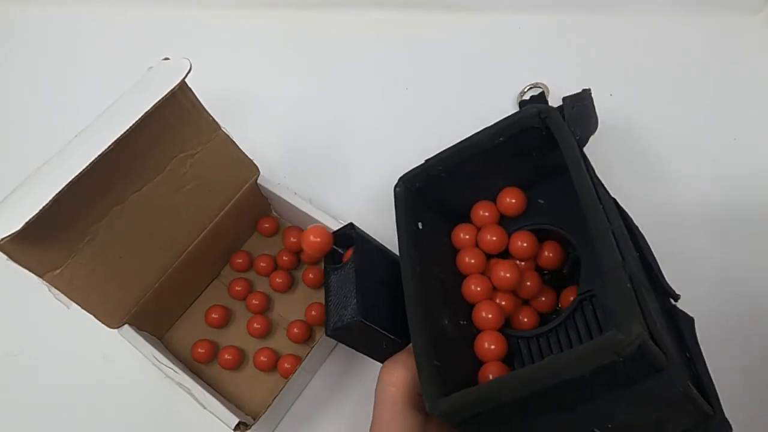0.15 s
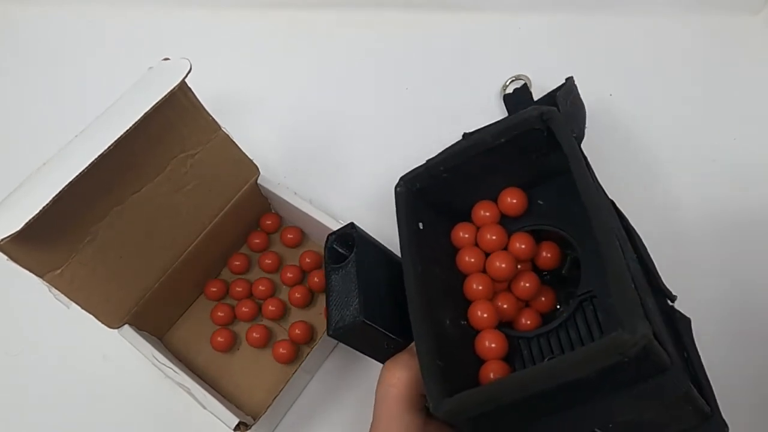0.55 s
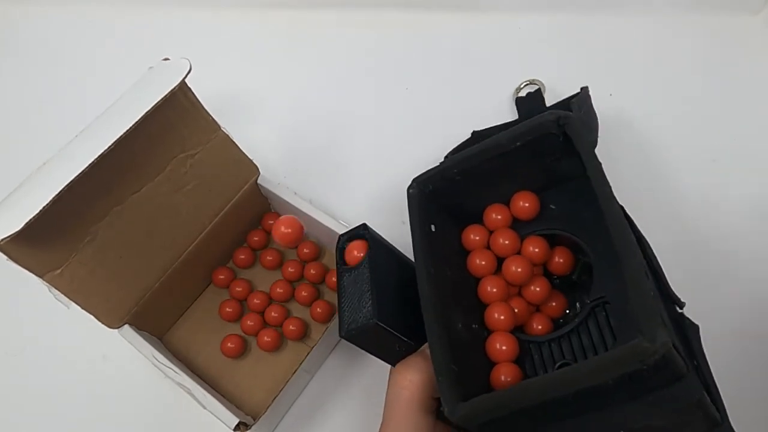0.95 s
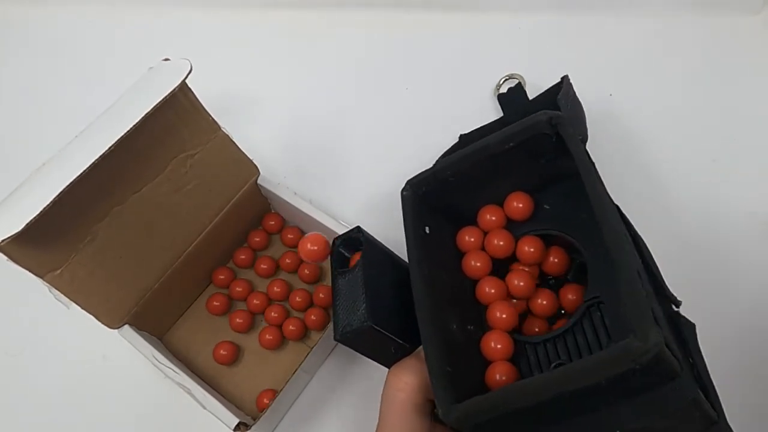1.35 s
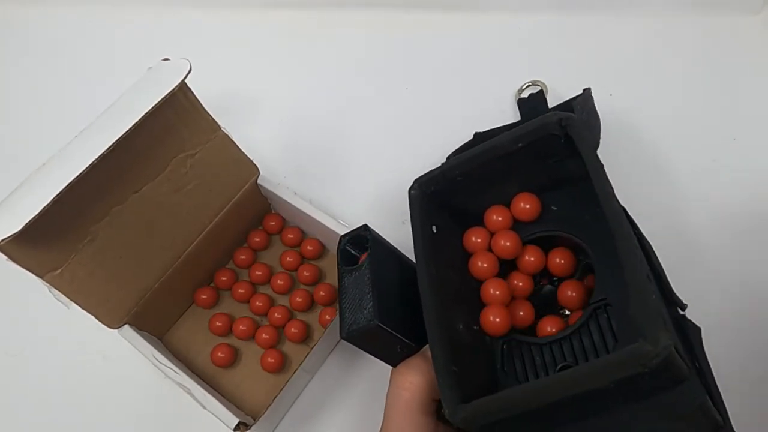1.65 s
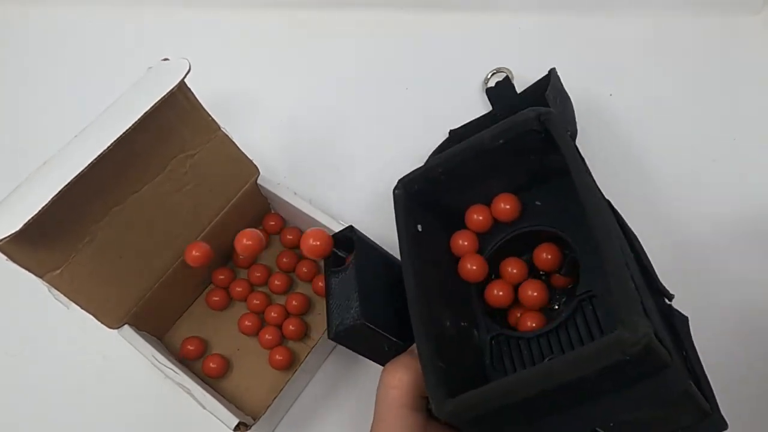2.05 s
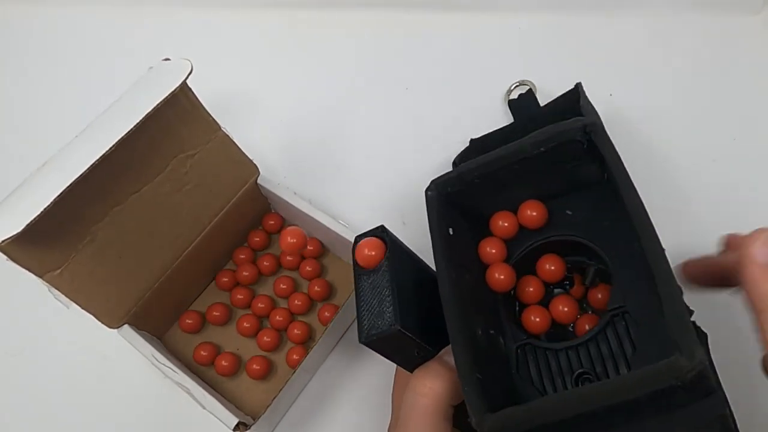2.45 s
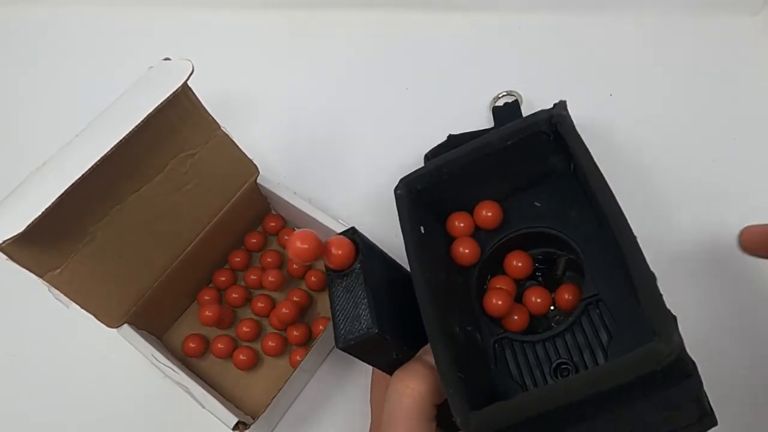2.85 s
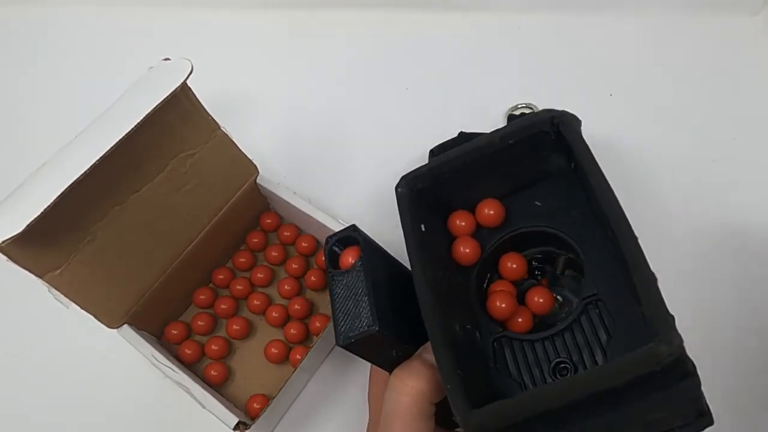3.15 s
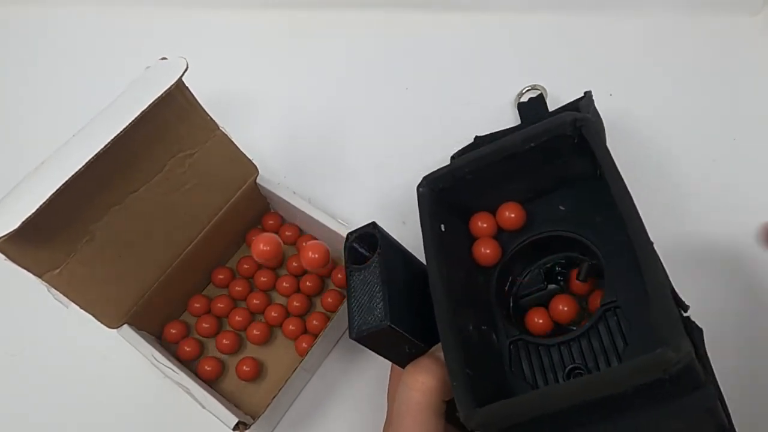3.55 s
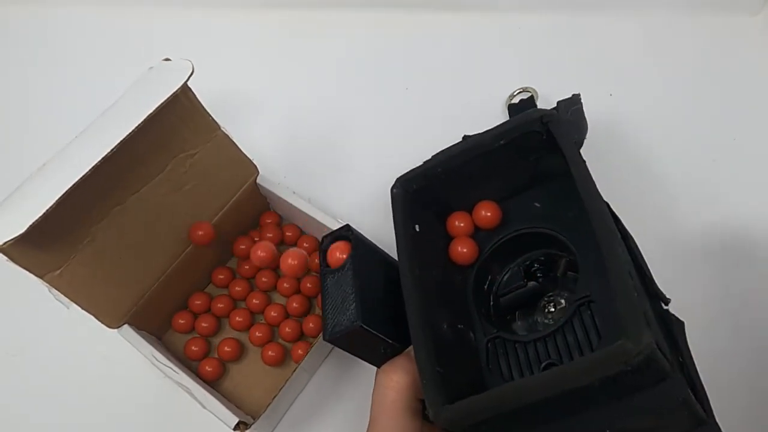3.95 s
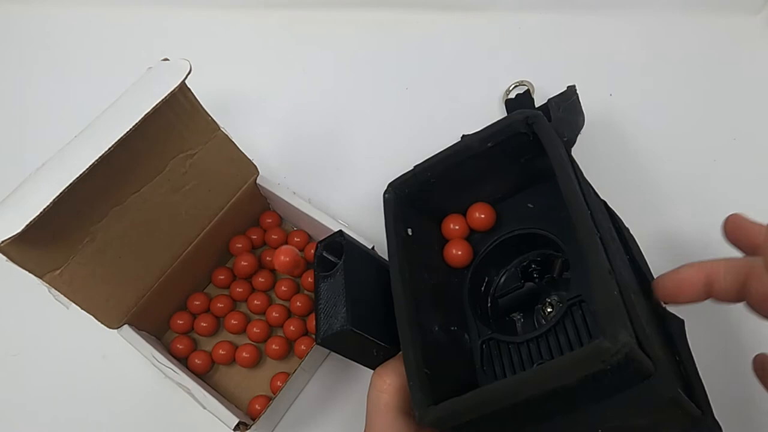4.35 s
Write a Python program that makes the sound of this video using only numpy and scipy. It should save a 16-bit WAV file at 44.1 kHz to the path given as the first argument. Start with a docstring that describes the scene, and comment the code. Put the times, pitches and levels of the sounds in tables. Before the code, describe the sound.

Small balls clatter in a plastic feeder while a finger taps its shell and balls drop into a cardboard box.

```python
"""Balls clack and rattle in a plastic ball magazine, held close to the microphone in a room with a faint rumble.
The feeder stirs them against each other and the thin walls, and a part of it sings on after some contacts.
A finger taps the hollow shell and sets it ringing. The balls that come out drop into a cardboard box,
where they bounce and roll. The sound is almost mono."""
import sys
import numpy as np
from scipy import signal
from scipy.io import wavfile

SR = 44100
rng = np.random.default_rng(int(sys.argv[2]) if len(sys.argv) > 2 else 0)


def wrap_up_sound(samples):
    """Save the sound to the file named by the first command line argument, as 16-bit audio."""
    columns = np.atleast_2d(samples).T
    # keep every value between -1 and 1, then stretch to whole-number steps
    tamed = np.clip(columns, -1, 1)
    steps = np.round(tamed * 32767).astype(np.int16)
    wavfile.write(sys.argv[1], SR, steps)


N = 197952


def amp(db):
    return 10 ** (np.asarray(db) / 20)


def unit_rms(x):
    return x / np.sqrt(np.mean(x ** 2) + 1e-20)


def unit_peak(x):
    return x / (np.max(np.abs(x)) + 1e-12)


def butter(x, kind, hz, order=2):
    return signal.sosfilt(signal.butter(order, hz, kind, fs=SR, output="sos"), x)


def add(out, start_s, sound):
    at = round(start_s * SR)
    out[at:at + len(sound)] += sound[:N - at]


def ring(x, hz, t60):
    """One mode: a unit click sets a sine of height 1 ringing."""
    r, w = amp(-60 / (t60 * SR)), 2 * np.pi * hz / SR
    return signal.lfilter([0, np.sin(w)], [1, -2 * r * np.cos(w), r * r], x + 1e-18)


def resonate(x, hz, width_hz):
    """One resonance with a gain of 1 at its top."""
    r, w = np.exp(-np.pi * width_hz / SR), 2 * np.pi * hz / SR
    return (1 - r * r) / 2 * signal.lfilter([1, 0, -1], [1, -2 * r * np.cos(w), r * r], x)


def grains(count, per_s, spread_db):
    """Random clicks of uneven size and sign."""
    sizes = amp(spread_db * np.minimum(rng.exponential(1, count), 4)) * rng.choice([-1, 1], count)
    return sizes * (rng.random(count) < per_s / SR)


def soft_push(contact_s):
    """The push of a soft body: one half sine, then silence to ring out in."""
    t = np.arange(8000) / SR
    return np.sin(np.pi * np.minimum(t / contact_s, 1))


def wander(step_s):
    """Chance values joined by straight lines."""
    knots = np.arange(0, N / SR + 1, step_s)
    return np.interp(np.arange(N) / SR, knots, rng.standard_normal(len(knots)))


def swells(times, tops_db, rise_db_per_s, fall_db_per_s):
    """Gain of overlapping swells that rise to a top and fall away, added in power."""
    t = np.arange(0, N + 64, 64) / SR
    since_top = t - times[:, None]
    db = tops_db[:, None] + since_top * np.where(since_top < 0, rise_db_per_s, -fall_db_per_s)
    power = np.sum(amp(db) ** 2, axis=0)
    return np.interp(np.arange(N) / SR, t, np.sqrt(power))


# The room behind the magazine. Each row: centre of an octave band in Hz, level in dB.
RUMBLE_BANDS = [(25, -66), (45, -74), (90, -59)]


def room_rumble():
    """Low noise of the room: a part both channels share and a weaker part that sets them apart."""
    out = np.zeros((2, N))
    for hz, db in RUMBLE_BANDS:
        octave = butter(rng.standard_normal((2, N)), "band", [hz / np.sqrt(2), hz * np.sqrt(2)])
        out += amp(db) * unit_rms(octave)
    return out[0], amp(-15) * out[1]


# The feeder singing on after some contacts. Each row: top of the swell in seconds, level in dB.
SING_SWELLS = [(.028, -30.5), (0.279, -27), (.335, -35), (.942, -35), (1.204, -36), (1.435, -24),
               (1.469, -23), (1.535, -25), (1.758, -20), (1.81, -25), (1.895, -29), (2.044, -28),
               (2.116, -33), (2.511, -33), (2.716, -30), (2.754, -30), (2.96, -28), (3.098, -41),
               (3.319, -35), (3.617, -24), (3.844, -30), (3.975, -21.5), (4.33, -28)]
SING_HZ = 3341


def feeder_singing():
    """Grains of rubbing excite one narrow resonance in a part of the feeder."""
    times, tops_db = np.transpose(SING_SWELLS)
    rub = grains(N, per_s=2800, spread_db=4) * amp(3.3 * wander(step_s=0.022))
    tone = resonate(resonate(rub, SING_HZ, width_hz=48), SING_HZ, width_hz=390)
    return swells(times, tops_db, rise_db_per_s=3000, fall_db_per_s=253) * unit_rms(tone)


# Modes of the cardboard box. Each row: frequency in Hz, level in dB, time to fall 60 dB in seconds.
BOX_MODES = [(126.5, -13.5, 0.087), (179, -7.5, 0.081), (212.4, -2, 0.054), (275.6, 1.5, 0.062),
             (327.4, 0.5, 0.083), (385, 0, 0.034), (479.6, -3.5, 0.11), (580, -6.5, 0.09), (647, -10, 0.14),
             (850, 2, 0.034), (967, -6, 0.094), (1131, -2.5, 0.043)]


def balls_rolling():
    """Balls bump over the cardboard: louder after each landing, then settling to a faint rumble."""
    times, landing_db, _ = np.transpose(LANDINGS)
    gain = amp(-45) + swells(times, landing_db - 17, rise_db_per_s=2000, fall_db_per_s=84.5)
    bumps = grains(N, per_s=280, spread_db=5)
    box = sum((-1) ** k * amp(db) * ring(bumps, hz, 0.4 * t60)
              for k, (hz, db, t60) in enumerate(BOX_MODES))
    return gain * unit_rms(box)


# Balls landing in the box. Each row: start in seconds, level in dB, upper modes against low ones in dB.
LANDINGS = [(0.028, -15, 2), (.083, -11.5, 2), (0.212, -14, -1.5), (.295, -24, -5), (0.424, -26, 2),
            (.435, -9.5, -9), (0.521, -20.5, 2), (.582, -26, 6), (.634, -31, 9), (1.2046, -10.5, 3),
            (1.303, -24, -14), (1.36, -24.5, 3), (1.626, -20, 7.5), (1.712, -25, 1), (1.754, -21.5, -2),
            (1.799, -23, 1), (1.856, -24, -3), (2.225, -17, 4.5), (2.245, -17, 3), (2.274, -11, 1.5),
            (2.338, -9.5, -4), (2.365, -33, 15.5), (2.395, -26, 7.5), (2.459, -26, 2), (2.658, -11.5, 3.5),
            (2.782, -25.5, 7.5), (2.933, -17, 10), (2.943, -14, 7), (2.964, -30, -16), (3.033, -24, 7),
            (3.068, -18.5, 4), (3.174, -11, 3.5), (3.217, -15, 4), (3.238, -25, 5), (3.264, -23, 4),
            (3.784, -11, 1.2), (3.851, -33, 13), (3.89, -22, 7.5), (3.933, -22, -10), (4.096, -14.5, 4.5),
            (4.134, -11.5, -0.5), (4.162, -12, -4), (4.297, -20.5, -1.5), (4.328, -14.5, 5)]
FLOOR_HZ, FLOOR_SCATTER = 305, 0.048   # pitch the floor favours, relative scatter from spot to spot


def balls_landing():
    """Each spot favours other modes of the box; the floor yields slowly, the knock wakes upper modes."""
    out = np.zeros(N)
    yielding, knock = soft_push(contact_s=0.0018), soft_push(contact_s=0.00064)
    for start, db, upper_db in LANDINGS:
        low, upper = 0, 0
        spot_hz = FLOOR_HZ * np.exp(FLOOR_SCATTER * rng.standard_normal())
        for k, (hz, mode_db, t60) in enumerate(BOX_MODES):
            strength = amp(mode_db + 3.14 * rng.standard_normal())
            if hz < 420:
                octaves_off = abs(np.log2(hz / spot_hz))
                low += (-1) ** k * strength * amp(-5 * octaves_off) * ring(yielding, hz, t60)
            else:
                upper += rng.choice([-1, 1]) * strength * ring(knock, hz, t60)
        add(out, start, amp(db) * (unit_peak(low) + amp(upper_db) * unit_peak(upper)))
    return out


# Resonances of the magazine's thin plastic walls.
# Each row: frequency in Hz, width in Hz, level against the bare contact in dB.
WALL_RESONANCES = [(1540, 29, -11), (1590, 59, -4.5), (1883, 110, -2.5), (2160, 100, -12), (2607, 120, -6),
                   (2812, 20, 7.5), (3413, 256, 4.5), (4040, 140, 5), (4650, 180, 1), (4880, 38, -10),
                   (5080, 92, 4), (5475, 125, 1), (5916, 105, 7.5), (6360, 160, 0.5), (6790, 250, 2.5),
                   (7550, 690, 0), (8700, 97, -1.5), (9370, 180, -9), (9830, 52, 3.5), (11070, 300, -1),
                   (11650, 180, -4), (12400, 250, -11)]


def plastic_walls(contacts, spot_db):
    """The walls resonate as the contact spot allows; returns hollow ring, clack and treble bands."""
    sound = contacts
    for (hz, width_hz, db), offset_db in zip(WALL_RESONANCES, spot_db):
        sound = sound + resonate(amp(db + offset_db) * contacts, hz, width_hz)
    hollow = butter(sound, "band", [1336, 2555])
    clack = butter(butter(sound, "band", [2360, 11200]), "low", 7000, order=4)
    treble = butter(butter(sound, "band", [8700, 21900]), "low", 14000, order=1)
    return hollow, clack, treble


# The feeder stirring the balls.
# Each row: time in seconds, rattle level in dB, level of the treble above about 9 kHz in dB.
RATTLE_LEVELS = [(0, -26, -48), (.26, -37.5, -39), (.37, -48.5, -64), (0.611, -26.5, -43), (.86, -89, -63),
                 (.95, -21, -37), (1.09, -44, -53), (1.26, -36.5, -64), (1.4, -29, -38), (1.65, -29.5, -41),
                 (1.81, -22, -30), (1.99, -33, -43), (2.2, -25.5, -40), (2.33, -40, -54), (2.42, -32, -48),
                 (2.6, -36, -48), (2.75, -28.5, -40), (2.9, -46.5, -53), (3.01, -25.5, -44),
                 (3.14, -39, -43), (3.29, -28, -65), (3.46, -56, -51), (3.55, -31.5, -64),
                 (3.75, -25.5, -18), (3.89, -18.5, -44), (4.0, -40, -30), (4.49, -29, -53)]


def balls_rattling():
    """Small contacts inside the magazine come in clumps and wander over its walls."""
    times, rattle_db, treble_db = np.transpose(RATTLE_LEVELS)
    t = np.arange(N) / SR
    rattle_gain, treble_gain = amp(np.interp(t, times, rattle_db)), amp(np.interp(t, times, treble_db))
    contacts = grains(N, per_s=2800, spread_db=3.5) * amp(2.5 * wander(step_s=0.012))
    spot_db = [4 * wander(step_s=0.03) for _ in WALL_RESONANCES]
    hollow, clack, treble = plastic_walls(contacts, spot_db)
    return rattle_gain * unit_rms(clack + amp(11.5) * hollow) + treble_gain * unit_rms(treble)


# Modes of the hollow shell, and of the fingertip's brief slap on it.
# Each row: frequency in Hz, level in dB, time to fall 60 dB in seconds.
SHELL_MODES = [(498.3, -0.5, 0.094), (588, -4, 0.059), (610, -17, 0.034), (663, -7.5, 0.038),
               (710.5, 1.5, 0.072), (800.4, -11.5, 0.12), (995, -2, 0.034), (1330, -12, 0.071),
               (1416, -1.5, 0.02), (1522, -12, 0.048), (1983, -0.5, 0.031), (2250, -9, 0.029),
               (373, -15, 0.069), (437, -14.5, 0.045)]
SLAP_MODES = [(955, 4.5, 0.0051), (2010, 9.5, 0.0021)]
# A finger on the shell, close to the microphone.
# Each row: start in seconds, level in dB, offset of the first shell mode in dB.
FINGER_TAPS = [(0.118, -6, 1.5), (0.49, -5.5, 4), (0.858, -0.5, -1), (0.903, -12, -12), (1.222, -5, -1),
               (1.598, -5.5, -1.5), (1.948, -2, -1), (2.293, -11.5, 1), (2.599, -4.5, -1),
               (2.854, -3.5, -3.5), (3.162, -3.5, -3.5), (3.436, -5, -1.5), (3.717, -4, -2),
               (3.976, -5, -1.5), (4.204, -4, -3.5), (4.419, -1.5, -4)]


def finger_taps():
    """Every tap lands near the same spot, so the shell's modes keep almost the same balance."""
    out, push = np.zeros(N), soft_push(contact_s=0.00047)
    for start, db, first_mode_db in FINGER_TAPS:
        spot_db = 1.5 * rng.standard_normal(len(SHELL_MODES))
        spot_db[0] = first_mode_db
        detune = 1 + 0.012 * rng.standard_normal(len(SHELL_MODES))
        shell = sum((-1) ** k * amp(mode_db + spot_db[k]) * ring(push, hz * detune[k], t60)
                    for k, (hz, mode_db, t60) in enumerate(SHELL_MODES))
        slap = sum(amp(mode_db) * ring(push, hz, t60) for hz, mode_db, t60 in SLAP_MODES) / np.sum(push)
        add(out, start, amp(db) * (slap - unit_peak(shell)))   # the wall first moves inwards
    return butter(out, "high", 200)   # the shell is too small for bass


# Ball against ball or wall, close to the microphone. Each row: start in seconds, level in dB, pitch in
# Hz, hollow ring in dB, level of the treble above about 9 kHz heard with each clack in dB (both
# relative to the clack), time to fall 60 dB in seconds (capped at 0.4).
BALL_HITS = [(0.029, -13, 3150, -1, 1, .086), (.083, -5.5, 2580, -16, -14, 0.036),
             (.116, -28, 2760, 14, -23, 0.057), (0.176, -23, 3750, -13.5, -1, 0.094),
             (.206, -12.5, 6300, -12, -17, 0.21), (0.223, -15.5, 3280, 1, -3, 0.23),
             (0.281, -13.5, 3120, -30, -21, 0.14), (.333, -17.5, 3100, 6, -8, 0.084),
             (.423, -22, 3030, -16, -1, 0.096), (0.434, -12, 8400, -10, -15, 0.076),
             (.490, -19, 2700, 5.5, -1, 0.076), (.525, -21.5, 2870, -20, -6, .13),
             (0.5834, -13, 2550, 0, -3, 0.09), (.665, -1.5, 5370, -29, -43, 0.087),
             (.729, -22.5, 5230, -4, -37, 0.086), (0.783, -16.5, 5370, -6.5, -76, 0.093),
             (0.856, -20, 2710, 7.5, -4.5, 0.094), (0.9, -18.5, 3780, -4, -4.5, 0.075),
             (0.942, -8.5, 3160, -29, 2.5, 0.079), (1.006, -17.5, 3230, -4, -3, 0.2),
             (1.053, -22, 3260, 2, 0, 0.13), (1.116, -10, 5370, -23, -41, 0.077),
             (1.147, -19, 4260, -27, -33, 0.57), (1.203, -5.5, 3600, -32, 2, 0.1),
             (1.255, -16.5, 5460, -22, -6, 0.16), (1.311, -18.5, 3600, 6, 2, 0.7),
             (1.358, -15, 3220, -17, -10, 0.16), (1.437, -11.5, 3100, -3.5, -4, 0.15),
             (1.471, -9, 2830, -35, -3, .27), (1.533, -4, 4230, -3.5, -16, .16),
             (1.551, -10, 3230, 1, -1, .13), (1.597, -10.5, 6300, -5, -20, 0.026),
             (1.627, -13, 7450, -11, 2.5, 0.061), (1.669, -15, 3250, 2.5, 0.5, 0.57),
             (1.703, -15.5, 3940, 4, 2, 0.11), (1.757, -2, 5400, -15, -10, 0.083),
             (1.812, -7.5, 3240, -5, -31, .2), (1.895, -12, 3240, -8, -6.5, 0.084),
             (1.949, -17.5, 3200, 5.5, -6, 0.1), (1.995, -15.5, 2820, -3, -2.5, 0.14),
             (2.044, -4.5, 3520, -7.5, -13, 0.19), (2.115, -7, 3360, -4.5, -2, 0.2),
             (2.143, -3, 4900, -5.5, -7.5, 0.098), (2.202, -15.5, 4530, -25, -26, 0.12),
             (2.246, -9, 6660, -6.5, -27, 0.088), (2.274, -8, 7000, -22, 0, 0.078),
             (2.337, -8.5, 2620, -3.5, 1.5, 0.15), (2.388, -9.5, 4000, 3, 1.5, 0.22),
             (2.436, -13.5, 3240, -23, -1, 0.21), (2.455, -7, 5070, 1, -10, .083),
             (2.51, -10.5, 3160, 4, 5, 0.08), (2.539, -9, 3120, -1, -6, 0.19),
             (2.597, -16, 2740, -35, -17, 0.053), (2.658, -10.5, 2770, -2, 5, 0.098),
             (2.714, -21, 3760, -1.5, -2, 0.14), (2.754, -6, 5500, -13, -6.5, 0.1),
             (2.853, -20.5, 3030, 3, -4, .067), (2.919, -27.5, 3350, 8, 0, .13),
             (2.933, -6, 7100, -2.5, -4, .24), (2.997, -14.5, 3440, 10, -14, 0.063),
             (3.095, -18.5, 3070, 6, 0, 0.14), (3.163, -17, 2700, -9, -3, 0.44),
             (3.172, -10, 2840, -9, -0.5, 0.1), (3.215, -12.5, 2870, 1, 2.5, 0.24),
             (3.268, -17, 2900, -9, -6, 0.09), (3.319, -0.5, 5250, -13, -15, 0.064),
             (3.367, -15, 2600, -3, -5.5, 0.066), (3.434, -25.5, 2700, 7.5, -5, 0.11),
             (3.484, -3, 5020, -6.5, -49, .11), (3.527, -16.5, 2760, -5, 3, 0.16),
             (3.541, -11, 5450, -6, -12, 0.12), (3.581, -16.5, 3430, 4.5, 0, 0.07),
             (3.615, -14.5, 3420, 3, 5.5, 0.16), (3.664, -16.5, 3370, 0, -1, 0.13),
             (3.709, -12, 3130, 0.5, -2, 0.2), (3.745, -1, 4870, -3.5, -41, 0.075),
             (3.784, -10.5, 3300, -10, -31, 0.25), (3.844, -5.5, 5900, -3, -7, 0.08),
             (3.858, -13, 4020, -14, -3, 0.43), (3.879, -3.5, 5140, -6, -9, 0.19),
             (3.959, -3.5, 5070, -18, -41, .064), (3.974, -5.5, 3340, -1, -30, 0.096),
             (4.014, -9, 5900, -7.5, -4, 0.23), (4.048, 1, 4600, -12, -36, 0.12),
             (4.095, -1.5, 5170, -8, -9, .13), (4.136, -3.5, 7150, -6, -6, 0.081),
             (4.164, -4, 7200, -12, -40, 0.068), (4.204, -14.5, 2530, -5, -30, .061),
             (4.257, -12.5, 6500, -14, -1.5, 0.07), (4.294, -16, 5650, -28, -4, 0.1),
             (4.327, -8.5, 7300, -4, -38, 0.15), (4.360, -14, 3100, 0, -7, .15),
             (4.386, -14.5, 3130, -19, -2, 0.11), (4.417, -13, 2560, -5, -12, .11),
             (4.442, -19, 5900, 2, -25, 0.093), (4.468, -13, 4320, -19, -23, .13)]
JOLT_S = 0.0035


def balls_clacking():
    """A hit jolts the neighbours: a sharp start, then grainy chatter that dies; the treble fades first."""
    out, t = np.zeros(N), np.arange(6500) / SR
    jolt = 1 + 0.14 * np.exp(-t / JOLT_S)
    for start, db, hz, hollow_db, treble_db, t60 in BALL_HITS:
        fade = jolt * amp(-60 * t / min(t60, 0.4))
        chatter = fade * (rng.standard_normal(len(t)) + 1.67 * grains(len(t), per_s=1500, spread_db=-1))
        spot_db = 4.5 * rng.standard_normal(len(WALL_RESONANCES))
        hollow, clack, treble = plastic_walls(chatter, spot_db)
        pitched = resonate(chatter, hz, width_hz=0.16 * hz)
        clack = unit_peak(clack) + amp(-0.5) * unit_peak(pitched)
        hollow = amp(hollow_db) * unit_peak(hollow)
        treble = amp(treble_db) * unit_peak(treble * amp(-60 * t))
        add(out, start, amp(db) * (unit_peak(clack) + hollow + treble))
    return out


def scene():
    """Close up and almost mono: the channels differ faintly, most in the treble and the rumble."""
    mid = finger_taps() + balls_landing() + balls_clacking()
    mid += balls_rattling() + balls_rolling() + feeder_singing()
    mid = butter(mid, "high", 104)   # little is heard below about 100 Hz
    smear = rng.standard_normal(400) * amp(-60 * np.arange(400) / 400)   # 9 ms of dying noise
    bright = amp(-6) * mid + butter(mid, "high", 3360)
    side = amp(-46.5) * np.convolve(bright, smear / np.linalg.norm(smear))[:N]
    rumble_mid, rumble_side = room_rumble()
    mid, side = mid + rumble_mid, side + rumble_side
    return np.array([mid + side, mid - side])


def record(dry):
    """The microphone falls off in the top octave, peaks are rounded, and the top is cut by 16.6 kHz."""
    heard = butter(dry, "low", 9440)
    rounded = 1.095 * np.tanh(heard / 1.288)
    return signal.sosfilt(signal.cheby2(12, 60, 16600, fs=SR, output="sos"), rounded)


dry = scene()
out = record(dry)
wrap_up_sound(out)
```